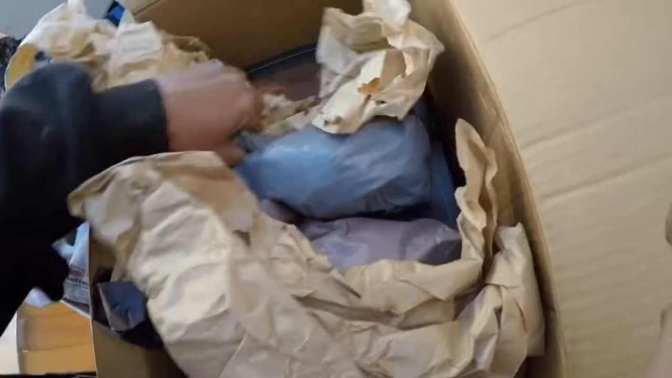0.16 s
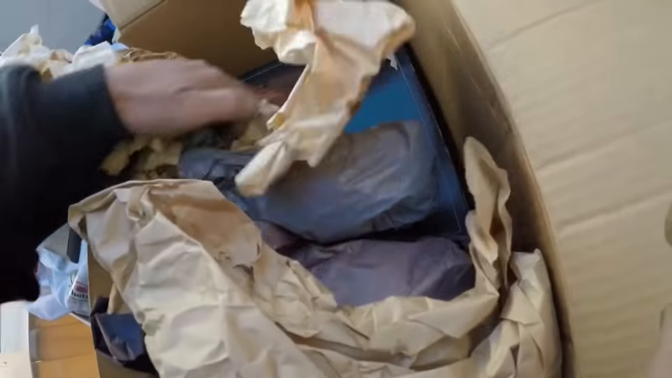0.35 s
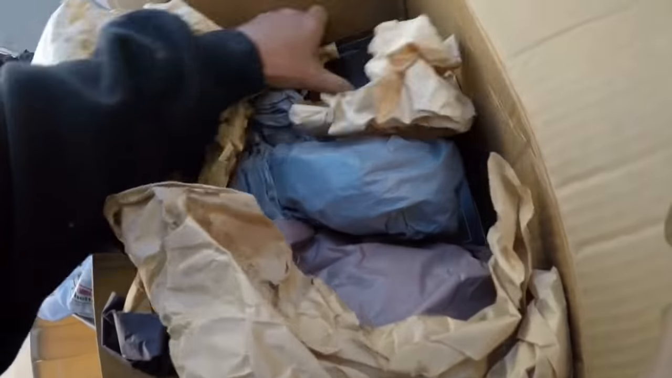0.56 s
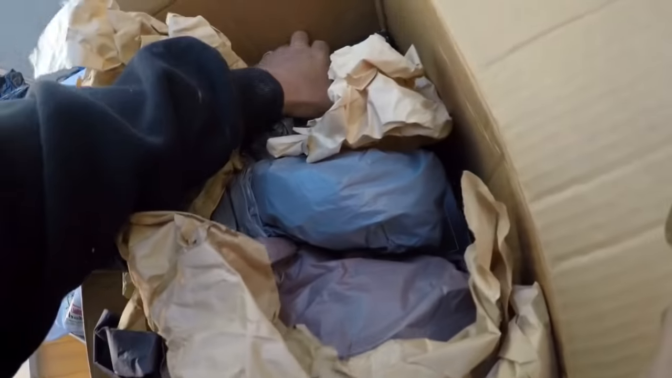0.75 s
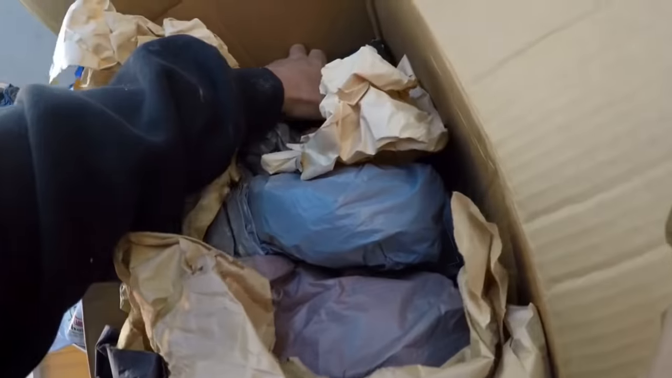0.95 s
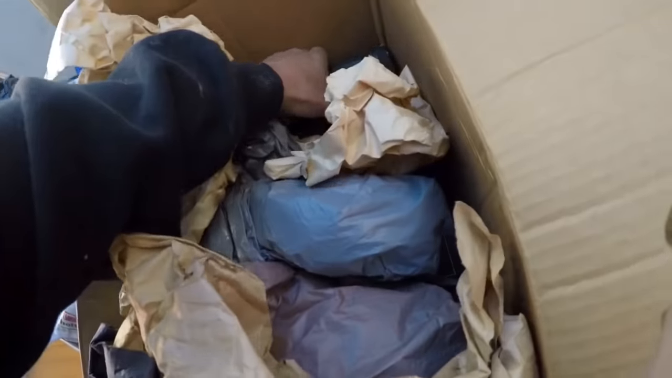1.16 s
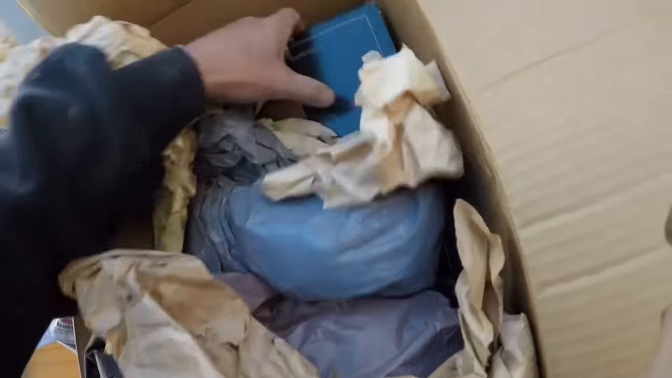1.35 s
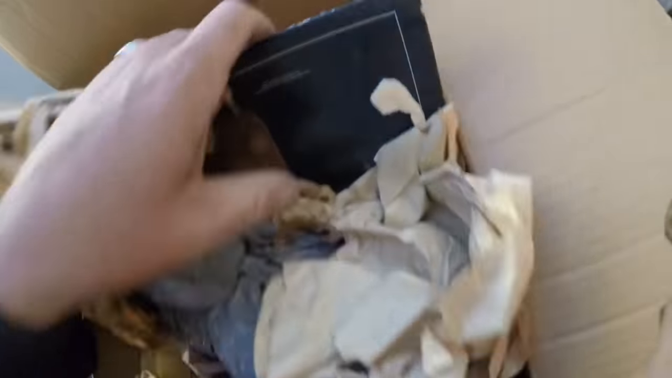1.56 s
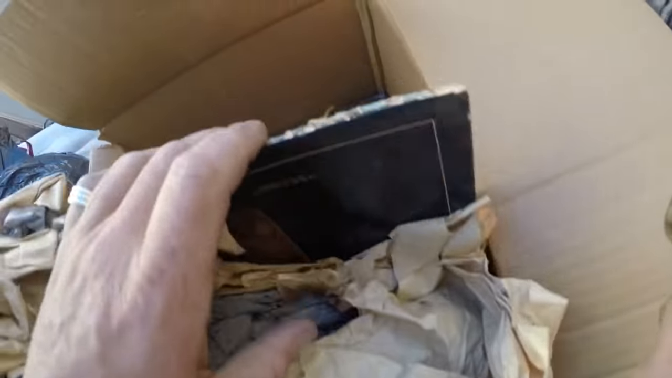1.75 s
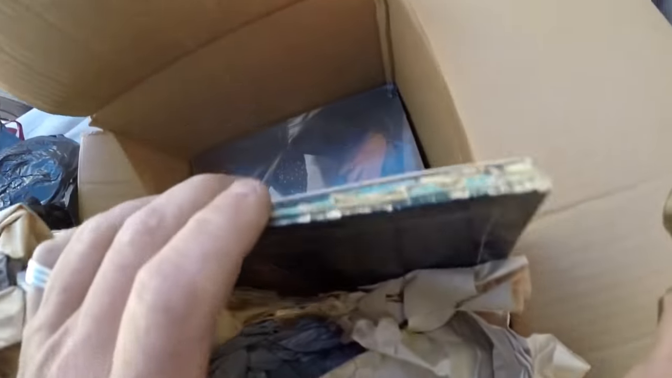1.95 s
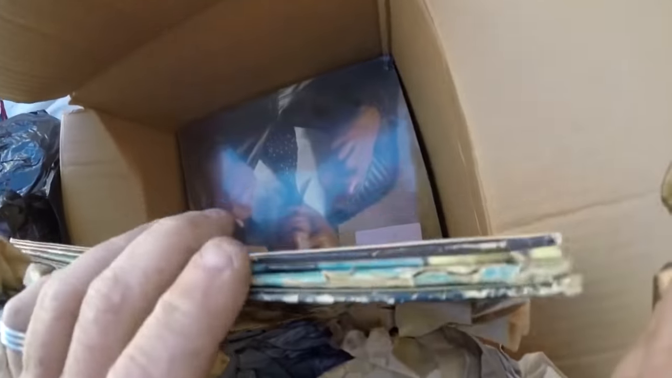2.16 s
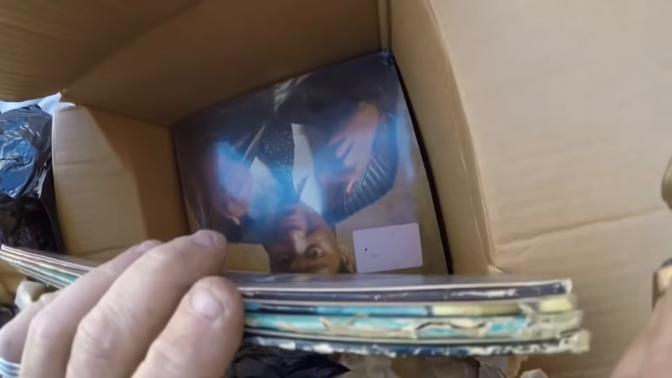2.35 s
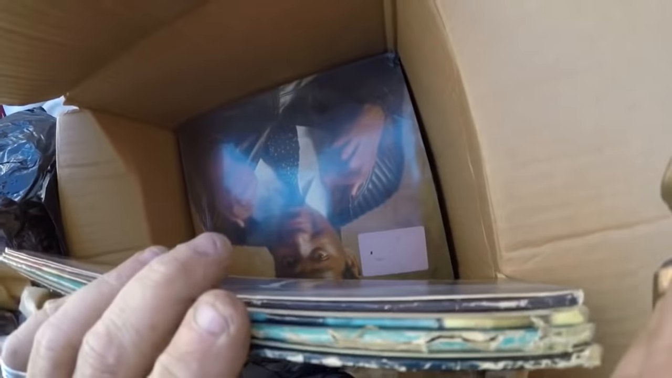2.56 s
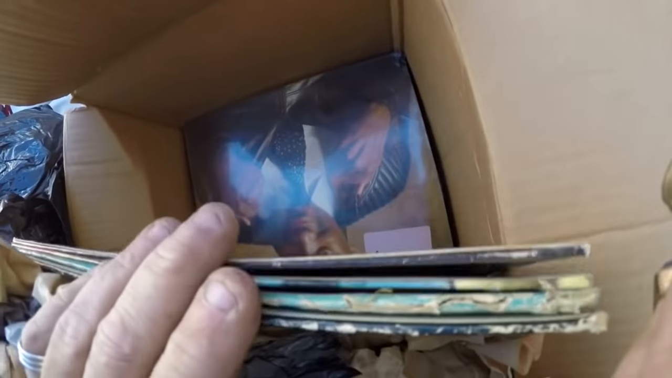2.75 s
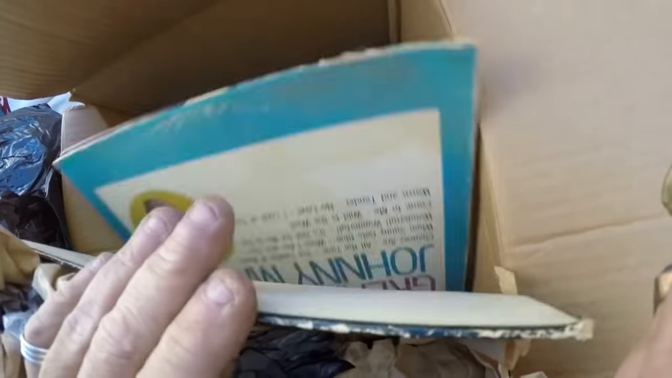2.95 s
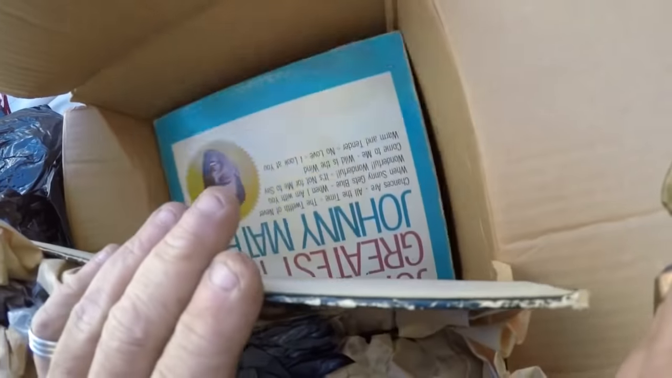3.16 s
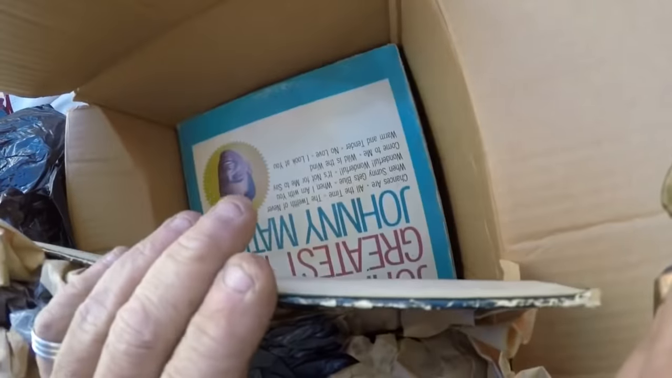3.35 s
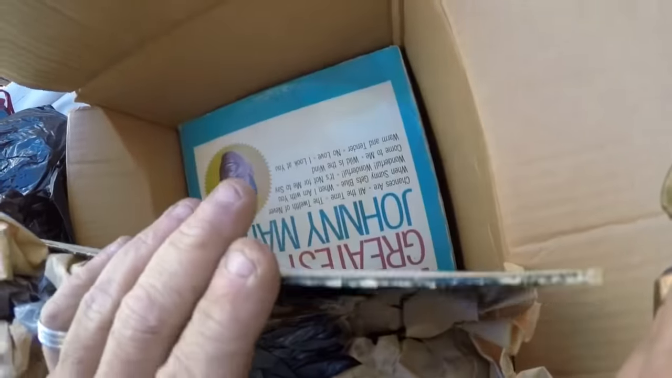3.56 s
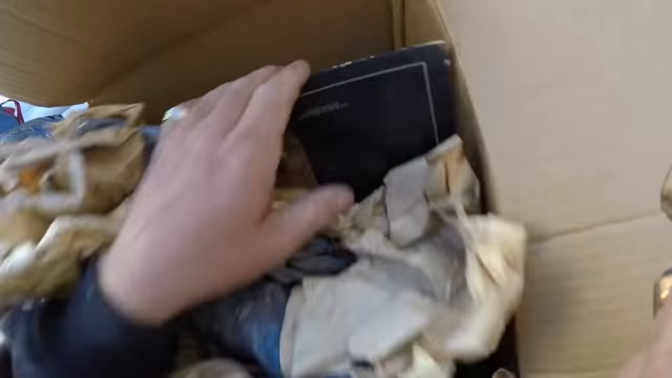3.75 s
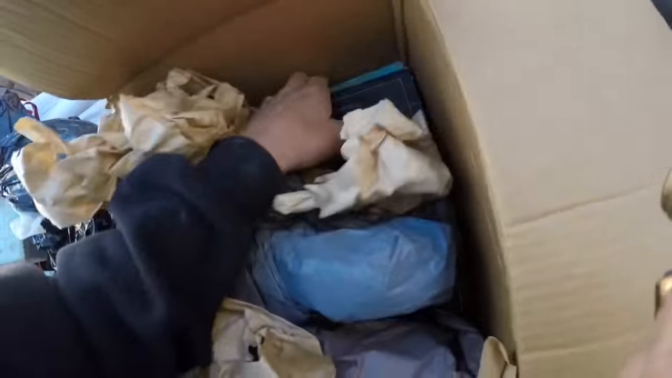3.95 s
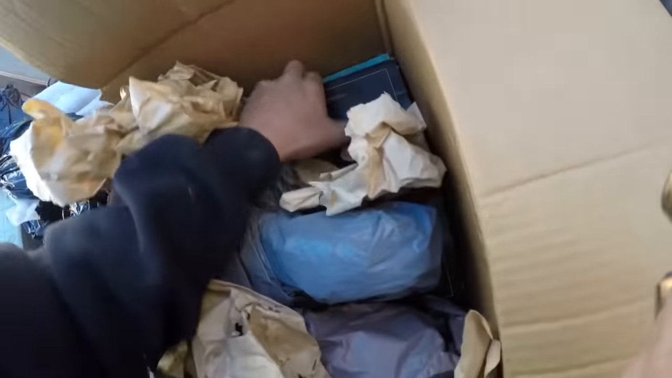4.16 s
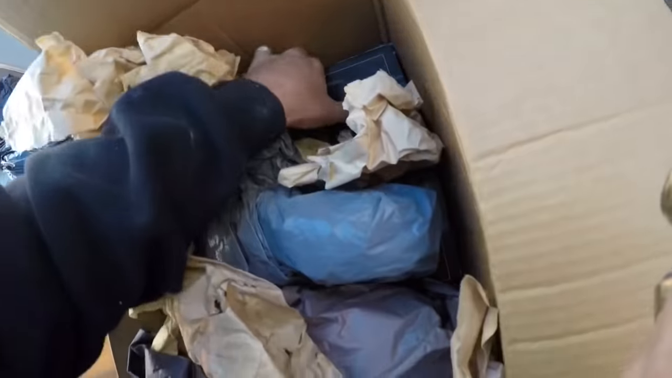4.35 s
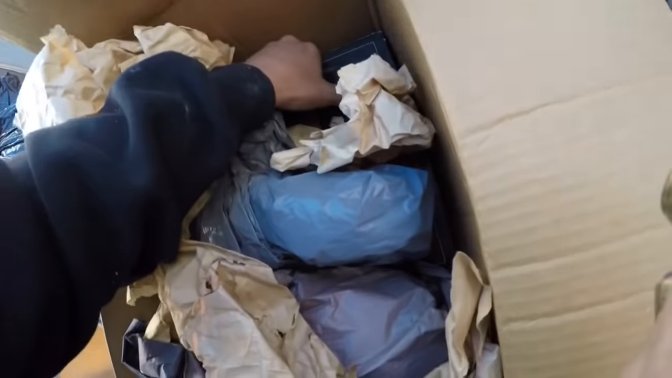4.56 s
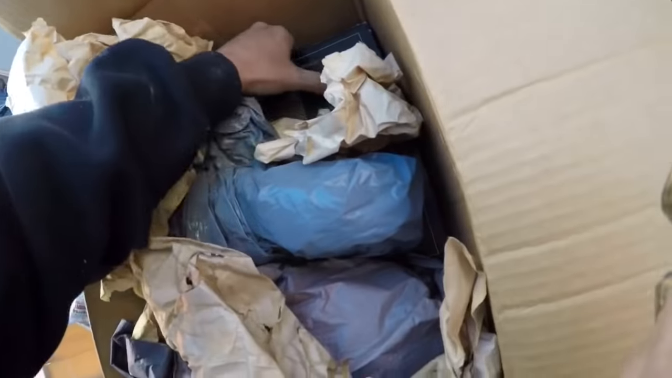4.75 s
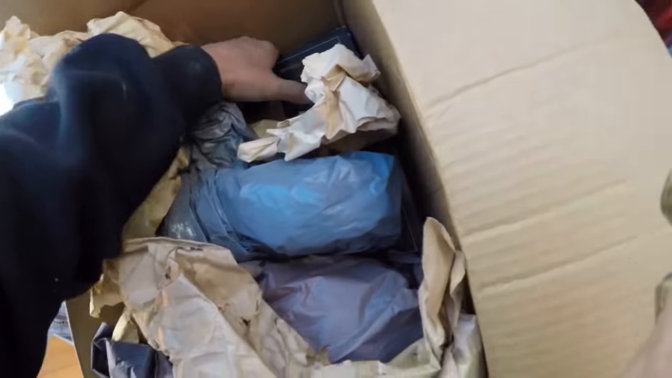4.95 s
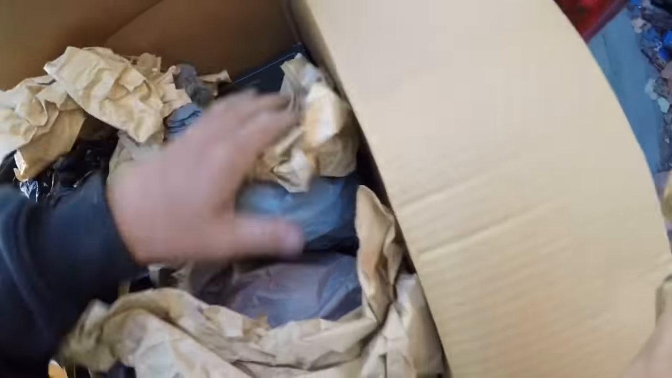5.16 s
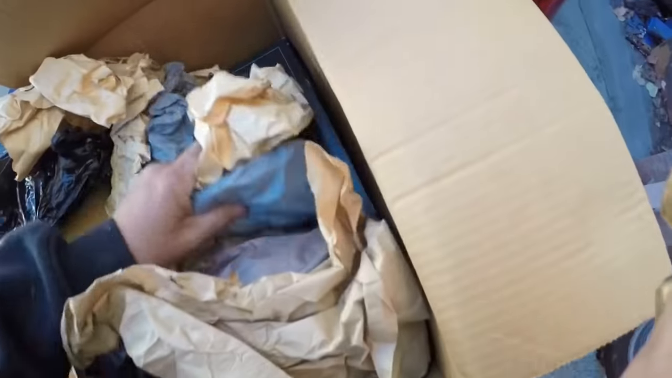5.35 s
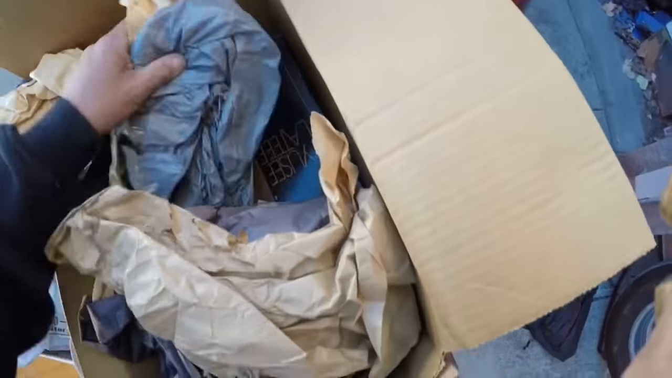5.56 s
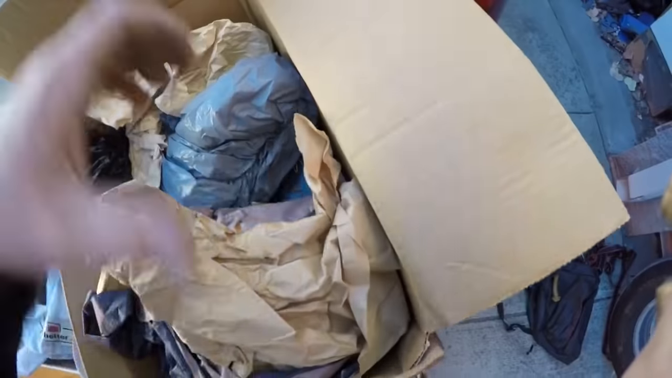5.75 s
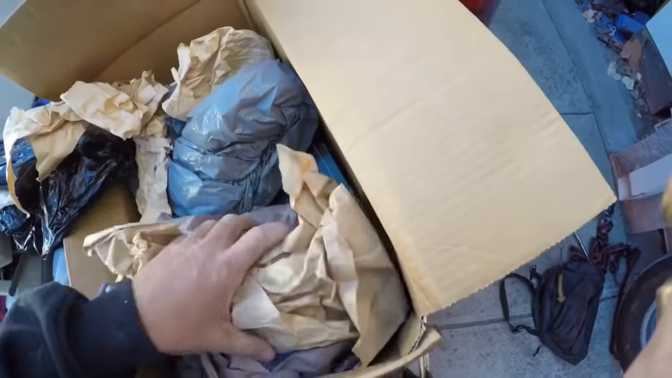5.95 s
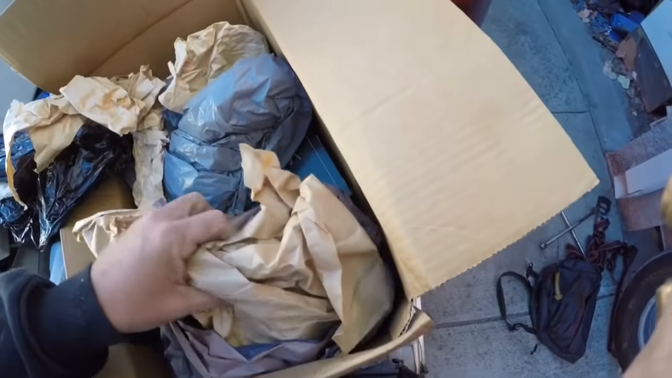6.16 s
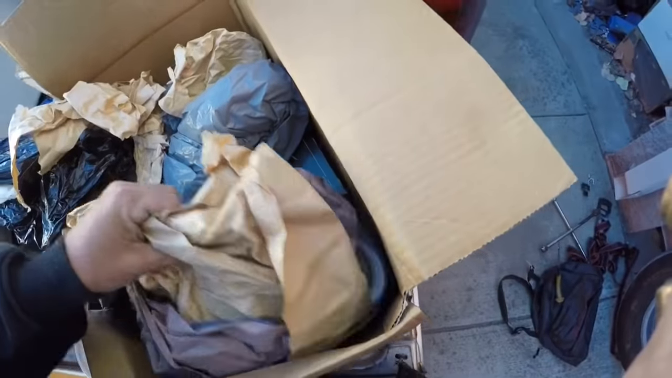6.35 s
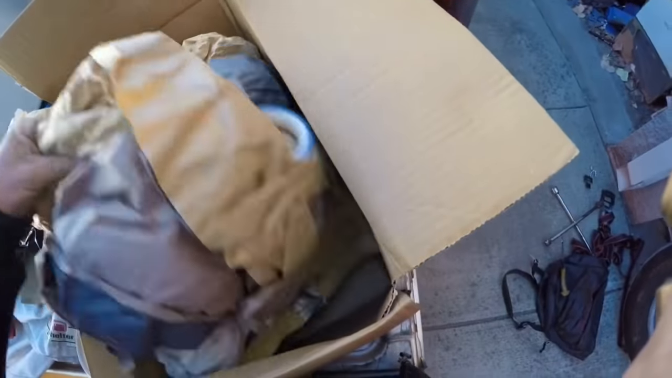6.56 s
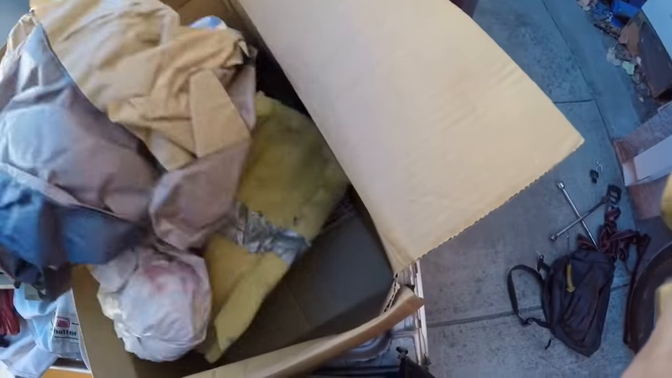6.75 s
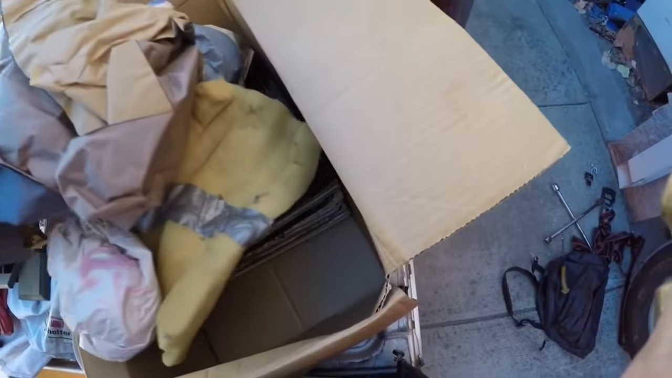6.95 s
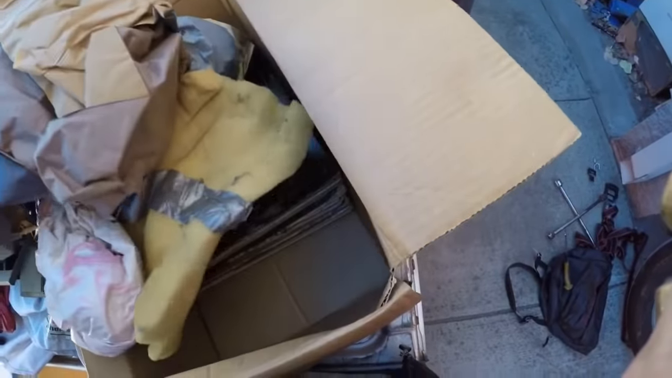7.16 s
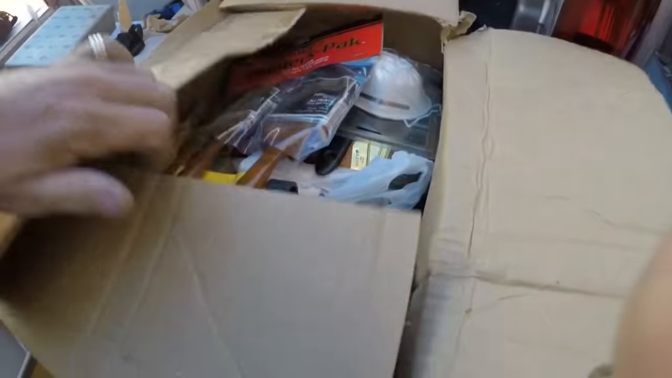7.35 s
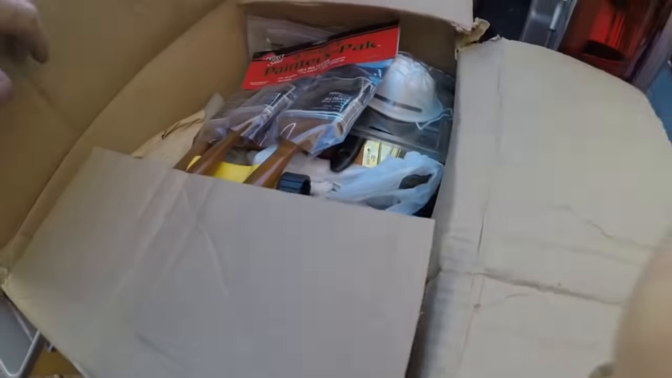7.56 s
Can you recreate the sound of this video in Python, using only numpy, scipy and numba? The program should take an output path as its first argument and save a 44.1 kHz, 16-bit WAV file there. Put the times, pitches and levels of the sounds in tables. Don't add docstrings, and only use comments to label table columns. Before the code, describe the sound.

A hand digs through crackling wrapping paper and card sleeves, box walls thudding softly, then hard objects clack sharply in a second box.

```python
import sys
import numpy as np
from scipy import signal
from scipy.fft import rfft, irfft, next_fast_len
from scipy.io import wavfile
from scipy.ndimage import uniform_filter1d, map_coordinates
from numba import njit

SR = 44100
rng = np.random.default_rng(int(sys.argv[2]) if len(sys.argv) > 2 else 0)


def dump(signal):
    limited = np.clip(np.atleast_2d(signal).T, -1, 1)
    pcm = np.round(limited * 32767).astype(np.int16)
    wavfile.write(sys.argv[1], SR, pcm)


def makeup_ratio(level_db):
    decades = np.asarray(level_db, float) / 20
    return 10 ** decades


N = 339562
T = np.arange(N) / SR

# t/s of most force, crumpling level/dB, rise/ms, fall/ms
DIGGING = [(0.003, -24.5, 129, 74), (0.046, -28, 42, 110), (0.158, -24.5, 66, 180),
           (0.507, -27.5, 134, 190), (0.555, -27.5, 28, 123), (0.688, -32, 27, 16), (0.736, -35, 37, 33),
           (0.84, -36.5, 51, 40), (0.932, -42.5, 110, 56), (0.968, -43.5, 32, 49), (1.053, -39, 80, 75),
           (1.122, -36, 67, 28), (1.204, -42, 16, 57), (1.389, -27.5, 103, 170), (1.548, -21, 99, 120),
           (1.755, -52, 37, 119), (1.828, -33.5, 68, 46), (1.914, -31, 97, 170), (2.147, -40.5, 360, 30),
           (2.244, -50.0, 35, 27), (2.283, -42, 42, 28), (2.326, -46, 27, 47), (2.36, -50, 26, 69),
           (2.424, -42.5, 27, 135), (2.576, -56, 53, 37), (2.674, -46, 53, 48), (2.731, -48, 42, 49),
           (2.792, -44.5, 59, 58), (2.888, -40.5, 14, 99), (2.988, -26.5, 62, 66), (3.059, -27, 27, 40),
           (3.098, -25.5, 37, 36), (3.164, -32, 31, 44), (3.245, -28, 34, 26), (3.33, -50, 21, 36),
           (3.468, -61, 42, 9)]
# t/s of most force, crumpling level/dB, rise/ms, fall/ms
PACKING = [(3.473, -58, 89, 23), (3.532, -68, 49, 36), (3.714, -27, 72, 66), (3.835, -25.5, 63, 41),
           (3.873, -27.5, 21, 320), (3.984, -33, 190, 15), (4.102, -63, 52, 32), (4.217, -32, 30, 37),
           (4.353, -37, 38, 41), (4.41, -35.5, 72, 15), (4.514, -42, 119, 43), (4.551, -34.5, 37, 43),
           (4.695, -37.5, 53, 30), (4.752, -38.5, 150, 37), (4.813, -41.5, 99, 17), (5.023, -32, 82, 25),
           (5.085, -32.0, 48, 140), (5.242, -25, 85, 270), (5.463, -30.5, 41, 65), (5.593, -29.5, 92, 32),
           (5.638, -32.5, 33, 28), (5.709, -32, 42, 33), (5.786, -44, 46, 42), (5.898, -14.5, 14.4, 29),
           (5.967, -27, 10, 59), (6.005, -26, 18, 29), (6.05, -24.5, 23, 47), (6.097, -24.5, 28, 110),
           (6.2, -21, 59, 89), (6.347, -26, 60, 44), (6.434, -32.5, 44, 60), (6.482, -33, 37, 39),
           (6.578, -33, 140, 39), (6.641, -34.5, 79, 33), (6.708, -37, 114, 30), (6.741, -39, 57, 35),
           (6.789, -38, 47, 27), (6.875, -33, 72, 38), (6.938, -37.5, 130, 54), (6.993, -36, 44, 180),
           (7.068, -35.5, 108, 24), (7.194, -62, 132, 29), (7.266, -47.5, 59, 23), (7.3, -41.5, 18, 46),
           (7.454, -28.5, 76, 30), (7.536, -27.5, 74, 54), (7.564, -27, 18.5, 23), (7.699, -36, 76, 199)]
# t/s, top octave against the middle level/dB
SHEET = [(0, -11.5), (.9, -24), (1.6, -13.5), (2.7, -15), (3.1, -12.5), (3.33, -10), (3.38, -27),
         (3.58, -11.5), (4.3, -13.5), (5.2, -11.5), (5.7, -4.5), (5.88, -16), (6.75, -12.5), (7.1, -27),
         (7.46, -4), (7.55, -14.5)]
# f/Hz, level/dB (per Hz)
PAPER_SPECTRUM = [(260, -19), (450, 1.5), (514, -2), (1530, -0.5), (1670, -2), (3250, 0), (4560, -2.5),
                  (13400, -17.5), (15300, -22)]
# t/s, peak level/dB, f/Hz, duration/ms
SNAPS = [(0.034, -12, 2800, 1.3), (0.158, -14, 4810, 3), (0.549, -19.5, 3070, 3), (0.831, -18, 2000, 1.7),
         (1.6767, -9.5, 2540, 1.05), (2.2832, -22.5, 3200, 4.1), (3.246, -23, 2230.0, 7.9),
         (3.2862, -28.5, 2390, 5.1), (3.326, -35.5, 2320, 9), (3.7315, -8, 4650, 1.76),
         (3.8345, -25, 2510.0, 6), (3.872, -17.5, 2980.0, 28), (3.9826, -9, 2560, 1.1),
         (4.0445, -23, 3940, 1.7), (4.403, -10, 3180, 2.7), (4.6947, -25, 4200, 4.1),
         (4.8187, -22, 4330, 5.8), (5.1984, -13.5, 2460, 5.2), (5.3396, -23, 3200, 6.2),
         (5.8482, -31, 3974, 14.5), (5.878, -7, 3960, 1.2), (5.897, -13, 3980, 20),
         (5.9128, -13, 2690, 8.5), (5.9633, -16, 1400.0, 3.4), (6.0071, -8.5, 3364, 2.3),
         (6.0495, -14.5, 4230, 3.9), (6.0967, -12, 3040, 9.6), (6.2017, -13.5, 3735, 7),
         (6.4308, -17, 2720, 2.7), (7.058, -7, 1900, 0.97)]
# t/s, peak level/dB
FOLDS = [(0.0116, -19), (0.138, -18), (0.191, -25), (1.0132, -31), (1.1625, -39), (1.2017, -31.5),
         (1.9005, -33), (2.1187, -29), (2.1424, -33), (2.155, -30), (2.2771, -38), (2.382, -37),
         (2.5768, -35.5), (2.6494, -36), (3.1587, -21), (3.468, -38), (3.8167, -21), (4.321, -27.5),
         (4.731, -25.5), (4.919, -30), (5.0797, -25), (5.4594, -16), (5.652, -23), (5.784, -23.5),
         (6.2202, -20), (6.58, -26), (6.6378, -28), (6.7, -24), (7.0716, -22), (7.185, -35)]
# t/s, peak level/dB, f/Hz
PINCHES = [(0.127, -10, 4260), (0.3681, -30, 2400), (0.4938, -23, 2160), (0.699, -33, 3040),
           (0.8474, -23, 1510), (0.9642, -33, 3530), (1.335, -22, 3600), (1.7709, -35, 3210),
           (2.2373, -33, 2570), (2.328, -32, 3670), (2.358, -38, 1700), (2.4138, -29, 2870),
           (2.4882, -29, 3030), (2.5095, -32, 1630), (2.6768, -28.5, 2840), (2.7262, -35, 2310),
           (2.7831, -32, 3100), (2.8799, -23.5, 4410), (3.2216, -19, 2210), (3.4311, -41, 1563),
           (3.5214, -35, 1710), (3.581, -31, 1500), (3.6441, -18, 1500), (3.7893, -20, 2800),
           (4.3427, -24, 2460), (4.5062, -33, 2853), (4.8776, -31, 2240), (4.9382, -31, 1980),
           (4.9861, -27, 2860), (5.0639, -15, 1680), (5.2245, -16, 3190), (5.3727, -29, 3974),
           (5.4334, -16, 2820), (5.492, -19, 2594), (5.625, -19, 3550), (5.7558, -25, 2650),
           (6.1674, -8, 2740), (6.3071, -18, 3520), (6.546, -18, 1600), (6.5685, -23, 3000),
           (6.9965, -26, 2605), (7.0155, -25, 2556), (7.1489, -39, 1922), (7.2384, -29, 1700)]
# t/s, peak level/dB, f/Hz
FLICKS = [(0.0737, -19, 6170), (0.156, -19, 6920), (0.212, -21, 6240), (0.8759, -37, 6760),
          (0.9284, -44, 7240), (1.0133, -30, 6030), (1.1607, -30, 6960), (1.2007, -27, 7800),
          (1.298, -34, 6350), (1.5359, -17, 6090), (2.1415, -33, 6080), (3.2117, -32, 6240),
          (3.7028, -30, 7210), (3.7302, -13, 6180), (4.6973, -25, 6200), (4.8187, -27, 7570),
          (5.0637, -29, 6040), (5.0789, -25, 7640), (5.198, -16, 6000), (5.2124, -16, 6620),
          (5.3407, -18, 9260), (5.5877, -32, 8260), (5.6758, -23, 6180), (5.784, -28, 7730),
          (5.8711, -20, 6100), (5.889, -20, 6320), (5.9715, -22, 6640), (5.9884, -15, 6650),
          (6.051, -16, 7270), (6.146, -18, 7800), (6.3436, -19, 6630), (6.6371, -30, 6035),
          (6.869, -26, 6300), (6.8833, -31, 7990), (7.0571, -15, 6460), (7.1344, -40, 6000)]
# t/s, extra path/m, echo share (ratio)
TIPPING = [
    (2.88, 0.53, 0.014),
    (2.95, 0.49, 0.34),
    (3.04, 0.38, 0.11),
    (3.25, 0.36, 0.43),
    (3.29, 0.26, 0.12),
]
# t/s, peak level/dB, ring against crack level/dB, duration/ms, ring f/Hz
CLACKS = [
    (7.355, -22, -18, 2.6, 530),
    (7.3957, -5.5, -9.5, 3.6, 1030),
    (7.427, -2.5, -9.5, 4.9, 1105),
    (7.4432, -8.5, -8, 7.7, 1120),
    (7.509, -16, -4, 5.4, 1095),
    (7.565, 0.5, -14.5, 6.2, 610),
    (7.6094, -27, 5, 3.5, 584),
]
# multiple of the ring f (ratio), level/dB, 60 dB decay time/s
ITEM_MODES = [(.66, -6, .03), (1, 4.5, 0.056), (1.2, -1, 0.026), (1.62, 7.5, .014), (2.301, -21, .012)]
# t/s of the peak, peak level/dB, ring f/Hz, duration/ms
KNOCKS = [(0.556, -3.5, 285.8, 6.7), (0.58, -14, 310.5, 2.3), (0.598, -11, 248.7, 7.8),
          (0.73, -27.5, 351.4, 21.7), (0.873, -29, 283.4, 26), (1.204, -29, 285.7, 9.5),
          (1.468, -21, 326, 7.6), (1.5, -21, 286.3, 6.3), (2.964, -21, 301.8, 6.2), (2.985, -14, 370, 4.7),
          (3.008, -11.5, 302.7, 11.5), (3.702, -18, 166.0, 21), (3.812, -18.5, 263, 4.1),
          (3.897, -4.5, 228.9, 2.6), (3.757, -20, 180, 8.3), (3.836, -23, 165, 5.8), (3.94, -22, 318, 8),
          (4.196, -19.5, 189.8, 6), (4.224, -25.5, 299.3, 18), (4.363, -18, 253, 3.9),
          (4.408, -2, 212.2, 7.2), (4.431, -20.5, 251, 10), (4.562, -33, 336.4, 6.6),
          (4.672, -31, 249, 9.1), (5.024, -25.5, 261, 13), (5.233, -22, 430.5, 7.8),
          (5.285, -27.5, 365, 7.7), (5.46, -30, 329.3, 6.6), (5.525, -25, 298, 5.2),
          (5.715, -24.5, 248, 5.2), (5.892, -17, 265, 7.2), (6.008, -24, 380, 5.9), (6.432, -22, 195.6, 13),
          (6.483, -8, 205.2, 6.5), (6.808, -20, 237, 7.7), (6.875, -21, 205.5, 6.5),
          (6.951, -20.5, 243, 5.9), (7.062, -21, 200.8, 6.2), (7.119, -24.5, 178.4, 19.4),
          (7.293, -22.5, 197, 8.2), (7.456, -15, 227, 6.2), (7.571, -17, 299.3, 7.2),
          (7.588, -15.5, 132.5, 19.6)]
# multiple of the ring f (ratio), level/dB, 60 dB decay time/s
WALL_MODES = [(.6, -3, 0.05), (1.4, -13.5, 0.16), (2.1, -17.5, 0.034)]
# t/s, level/dB, rise/ms
FLOPS = [
    (2.99, -19, 20),
    (3.71, -41, 46.3),
    (3.89, -33, 20),
    (7.582, -25, 13.86),
]
# t/s of the peak, peak level/dB, swing f/Hz, duration/ms
JOLTS = [(0.565, 2, 60, 14), (0.607, -10, 55.4, 75), (1.094, -15, 33.8, 67), (1.307, -15.5, 37, 67),
         (2.944, -6.5, 66, 14), (3.061, -18, 81.5, 60), (3.323, -14.5, 56.6, 14), (3.701, -11, 69.9, 13),
         (3.735, -2.5, 47.9, 8.4), (3.798, -7, 81, 7.2), (3.901, -5, 70.4, 21), (3.948, -4.5, 54.6, 14),
         (4.206, -2.5, 58.9, 31), (4.419, -14.5, 79, 41), (4.583, -12, 46.6, 21), (5.031, -16, 48.6, 49),
         (6.142, -7.5, 42.8, 24), (6.239, -7.5, 54, 16.2), (6.284, -7.5, 35.5, 37.6),
         (6.484, -3.5, 76.2, 8.9), (6.513, -10, 68.3, 21), (6.662, 0.5, 50.2, 13.2),
         (6.788, -7.5, 69.5, 18), (6.862, -10, 49, 17), (7.022, -4, 63.8, 8.7), (7.055, -7.5, 56, 24),
         (7.299, -7.5, 60.5, 15), (7.438, -4, 88, 10), (7.474, -4, 90, 14), (7.576, -14, 63.4, 57)]
# t/s, camera shaken level/dB, walls rubbed level/dB, rise/ms
SHOVES = [(0.0, -18.5, -30.5, 154), (0.58, -14, -19, 46), (0.738, -33, -29.5, 134),
          (1.489, -23.5, -31.5, 170), (1.89, -37, -38, 170), (3.001, -15.5, -21, 50), (3.237, -28, -38, 95),
          (3.7, -12.5, -27, 75), (3.896, -12, -19, 57.3), (4.212, -13, -35.5, 40.6), (4.414, -40, -29, 44),
          (4.55, -27, -36.5, 69), (4.687, -48, -30.5, 50.4), (5.021, -24, -32.5, 73), (5.191, -31, -46, 44),
          (5.25, -35, -31.5, 83), (5.47, -27.5, -32.5, 50), (5.741, -18, -37, 81), (5.905, -25, -24.5, 36),
          (6.212, -22.5, -32.5, 150), (6.493, -21, -20.5, 65), (6.657, -22, -36, 58),
          (6.858, -13.5, -32.5, 102), (7.124, -18, -43, 92), (7.445, -23, -20.5, 46), (7.53, -18, -29, 62),
          (7.62, -21.5, -31.5, 116)]
# t/s, rumble level/dB
GRIP = [(0, -33), (.94, -36.5), (1.35, -29), (2.15, -29), (2.44, -34), (2.85, -31), (3.4, -29.5),
        (4.9, -35), (6.0, -36), (6.35, -21), (7.0, -32.5), (7.7, -33)]
# f/Hz, level/dB (per Hz)
SHAKE_SPECTRUM = [(8.8, -44), (15, -2.5), (48, 6.5), (98, -4.5), (160, -14.5), (210, -20.5), (350, -120)]
# f/Hz, level/dB (per Hz)
RUB_SPECTRUM = [(65, -40), (110, -6.5), (361, -8.5), (463, -15.5), (1300, -27), (1690, -36), (2860, -120)]
# f/Hz, level/dB (per Hz)
YARD_SPECTRUM = [(88, -30), (150, 6.5), (402, -10), (823, -10.5), (1140, -13.5), (4000, -29), (15300, -70)]

SLIDING = (T > 1.9) & (T < 3.3)


def paper():
    still_db = -84
    level_db = swells(*np.transpose(DIGGING + PACKING), still_db)
    crisp_db = curves(SHEET)[0] + 0.3849 * (level_db + 39)

    creases_per_s, cycles = 6000, 7.6
    when, pitch, size = rng.random((int(creases_per_s * N / SR), 3)).T
    hz = 450 * 35 ** pitch
    db = tone_db(PAPER_SPECTRUM, hz) + 20 * np.log10(hz) - 3 * np.log(size + 0.0011)
    patches_per_s = 30
    patches = rng.standard_normal((8, int(patches_per_s * N / SR) + 2))
    db = db + 3.5 * map_coordinates(patches, [7 * pitch, when * patches_per_s * N / SR], order=1)
    creases = unit(ring(when * N / SR, hz, cycles / hz, makeup_ratio(db)), 1000, 9000)
    hiss = makeup_ratio(-6) * unit(noise(PAPER_SPECTRUM), 2600, 3500)
    sheet = unit(creases + hiss, 1440, 6200)
    calm = 1 - .6 * SLIDING
    sheet = sheet * makeup_ratio(calm * (.3 * walk(60) + 2.1 * walk(170)))

    ticks_per_s = 150
    when, pitch, size, length = rng.random((int(ticks_per_s * N / SR), 4)).T
    tick_db = -4.5 - 3.5 * np.log(size + .05)
    ticks = crack(when * N / SR, tick_db, 2000 * 7 ** pitch, .8 + 2.5 * length,
                  octaves=.45, skirt_db=-14, tail_db=-25, paper_share=.6, tear=.8)
    sheet = sheet + ticks * makeup_ratio(-0.15 * np.clip(level_db + 40, -9, 8))

    top = signal.sosfiltfilt(signal.butter(1, 7500, "high", fs=SR, output="sos"), sheet)
    return (sheet + top * (makeup_ratio(crisp_db + 8.0) - 1)) * makeup_ratio(level_db - 1.3)


def mirrored(sound):
    path_m, share = curves(TIPPING)
    dull = signal.sosfiltfilt(signal.butter(2, 5500, fs=SR, output="sos"), sound)
    delay_s = path_m / 343
    return sound + share * map_coordinates(dull, [(T - delay_s) * SR], order=3)


def snaps():
    big = crack(*np.transpose(SNAPS), tear=.12, skirt_db=-10.5)
    s, db = np.transpose(FOLDS)
    small_hz, small_ms = np.full(len(s), 2750.), np.full(len(s), 3.3)
    return big + crack(s, db, small_hz, small_ms, skirt_db=-3)


def small_creases():
    s, db, hz = np.transpose(PINCHES)
    pinches = crack(s, db - 6.5, hz, np.full(len(s), 4.1), octaves=0.22, skirt_db=-3)
    s, db, hz = np.transpose(FLICKS)
    flicks = crack(s, db - 2.5, hz, np.full(len(s), 2.6), octaves=0.37, skirt_db=-7, paper_share=0.21)
    return pinches + flicks


def crack(s, db, hz, ms, octaves=.7, skirt_db=-5, tail_db=-30, paper_share=1, tear=.35):
    t, f = T[:1024], np.arange(513) * SR / 1024
    bump = np.exp(-.5 * (np.log2(np.maximum(f, 1) / hz[:, None]) / octaves) ** 2)
    colour = makeup_ratio(paper_share * tone_db(PAPER_SPECTRUM, f)) * (bump + makeup_ratio(skirt_db))
    burst = irfft(rfft(rng.standard_normal((len(s), len(t)))) * colour)
    age = t / ms[:, None] * 1000
    rise = 0.045 + tear * rng.random((len(s), 1)) ** 2
    decay = makeup_ratio(-9 * age ** 2.2) + makeup_ratio(tail_db - 480 * t)
    burst = burst * decay * np.minimum(age / rise, 1)
    peak = np.sqrt(2 * uniform_filter1d(burst ** 2, size=40).max(axis=1))
    return place(s, burst * (makeup_ratio(db) / peak)[:, None])


def clacks():
    s, db, ring_db, ms, ring_hz = np.transpose(CLACKS)
    multiple, mode_db, t60 = np.transpose(ITEM_MODES)
    body_db = (db + ring_db)[:, None] + mode_db - 4.0
    body = ring(s[:, None], multiple * ring_hz[:, None], t60, makeup_ratio(body_db))
    return body + crack(s, db - 8.0, np.full(len(s), 2000.), ms, skirt_db=-6)


def knocks():
    s, db, hz, ms = np.transpose(KNOCKS)
    multiple, mode_db, t60 = np.transpose(WALL_MODES)
    start = s - 0.265 * ms / 1000
    struck = ring(start, hz, 4.0 * ms / 1000, makeup_ratio(db + 6.5))
    detune = 1 + 0.078 * rng.standard_normal((len(s), len(multiple)))
    others = ring(start[:, None], hz[:, None] * multiple * detune, t60, makeup_ratio(db[:, None] + mode_db))
    return signal.sosfilt(signal.butter(4, 520, fs=SR, output="sos"), struck + others)


def flops():
    s, db, ms = np.transpose(FLOPS)
    band_hz = 427, 740
    puff = signal.sosfilt(signal.butter(2, band_hz, "bandpass", fs=SR, output="sos"), rng.standard_normal(N))
    level_db = swells(s, db, ms, 0.83 * ms, -120)
    return unit(puff, *band_hz) * makeup_ratio(level_db + 2 * walk(90))


def jolts():
    s, db, hz, ms = np.transpose(JOLTS)[:, :, None]
    t = T[:8192] - T[4096]
    phase = 2 * np.pi * (hz * t + rng.random(s.shape))
    swell = np.exp(-np.log(2) * (2 * t / ms * 1000) ** 2 * np.where(t > 0, .7, 1.4))
    return place(s[:, 0] - T[4096], makeup_ratio(db - 1.5) * swell * np.cos(phase))


def handling():
    s, shove_db, press_db, ms = np.transpose(SHOVES)
    fall_ms = 1.13 * ms
    grip_db = curves(GRIP)[0]
    shake_db = swells(s, shove_db, ms, fall_ms, grip_db)
    rub_db = swells(s, press_db, ms, fall_ms, grip_db - 21)
    shake = unit(noise(SHAKE_SPECTRUM), 30, 130) * makeup_ratio(shake_db)

    wall_hz = curves(KNOCKS)[1]
    width_hz = 70
    push = signal.sosfilt(signal.butter(2, width_hz, fs=SR, output="sos"), rng.standard_normal((2, N)))
    phase = 2 * np.pi * np.cumsum(wall_hz) / SR
    hum = unit(push[0] * np.cos(phase) + push[1] * np.sin(phase), 130, 590)

    flutter_db = 1.5 * walk(60)
    scrape_db = -3.0 + 8 * SLIDING
    rub = hum + makeup_ratio(scrape_db) * unit(noise(RUB_SPECTRUM), 197, 380)
    return shake + rub * makeup_ratio(rub_db - 4.5 + flutter_db)


def yard():
    return unit(noise(YARD_SPECTRUM), 280, 16000) * makeup_ratio(-49.5)


def swells(s, db, rise_ms, fall_ms, rest_db):
    power = makeup_ratio(rest_db) ** 2
    for at, top, rise, fall in zip(s, db, rise_ms, fall_ms):
        drop_db = 10 * np.maximum((at - T) / rise, (T - at) / fall) * 1000
        power = power + makeup_ratio(top - drop_db) ** 2
    return 10 * np.log10(power)


def ring(s, hz, t60, size, phase=0.):
    s, hz, t60, size, phase = (np.ravel(a) * 1. for a in np.broadcast_arrays(s, hz, t60, size, phase))
    start = (np.maximum(s, 0) * SR).astype(np.int64)
    return rings(N, start, np.minimum(hz, SR * .45), np.maximum(t60, 2e-4), size, phase)


@njit
def rings(n, start, hz, t60, size, phase):
    out = np.zeros(n)
    for g in range(len(start)):
        p = np.exp(2j * np.pi * hz[g] / SR - np.log(1000) / (t60[g] * SR))
        z = size[g] * np.exp(1j * phase[g])
        for i in range(start[g], min(n, start[g] + int(t60[g] * SR))):
            out[i] += z.imag
            z *= p
    return out


def noise(points):
    size = next_fast_len(N)
    hz = np.arange(size // 2 + 1) * SR / size
    return irfft(rfft(rng.standard_normal(size)) * makeup_ratio(tone_db(points, hz)), size)[:N]


def tone_db(points, hz):
    f, db = np.transpose(points)
    return np.interp(np.log(np.maximum(hz, 1)), np.log(f), db, left=-60, right=-60)


def unit(x, lo_hz, hi_hz):
    band = signal.sosfilt(signal.butter(2, [lo_hz, hi_hz], "bandpass", fs=SR, output="sos"), x)
    return x / np.sqrt(np.mean(band ** 2))


def walk(rate):
    k = int(SR / rate)
    held = np.repeat(rng.standard_normal(N // k + 1), k)
    return np.sqrt(3 / 2) * uniform_filter1d(held, k)[:N]


def curves(table):
    s, *columns = np.transpose(table)
    return [np.interp(T, s, c) for c in columns]


def place(s, rows):
    out = np.zeros(N + rows.shape[1])
    start = np.maximum(s * SR, 0).astype(int)
    np.add.at(out, start[:, None] + np.arange(rows.shape[1]), rows)
    return out[:N]


def scene():
    folds = mirrored(paper()) + snaps() + small_creases()
    box = clacks() + knocks() + flops()
    case = jolts() + handling()
    return (folds + box + case + yard())[None]


def top_cut(x):
    return signal.sosfilt(signal.butter(12, 16470, fs=SR, output="sos"), x)


def record(dry):
    moving = signal.lfilter([1, -1], [1, -.998], dry)
    limited = .95 * np.tanh(moving / .95)
    top_hz = 15350
    cut = signal.sosfilt(signal.ellip(12, .2, 60, top_hz, fs=SR, output="sos"), limited)
    sounding = (T < 7.3242) | (T > 7.3346)
    return top_cut(cut * sounding)


dry = scene()
out = record(dry)
dump(out)
```